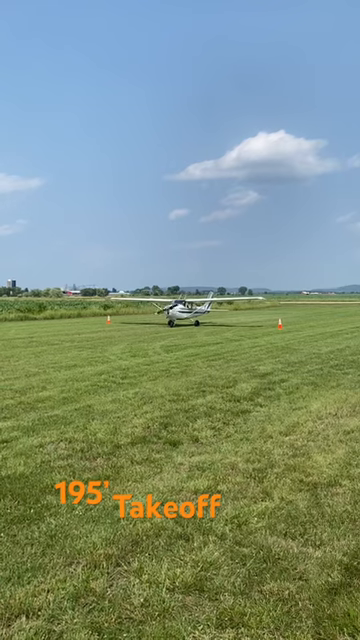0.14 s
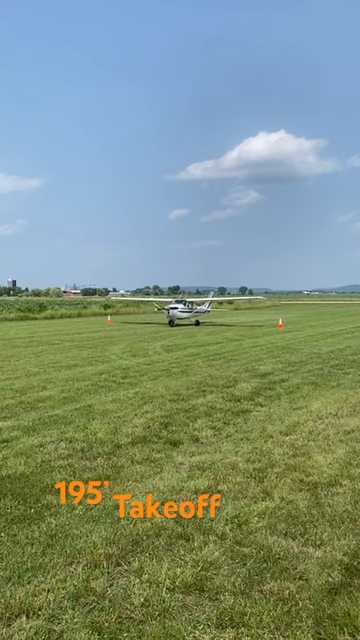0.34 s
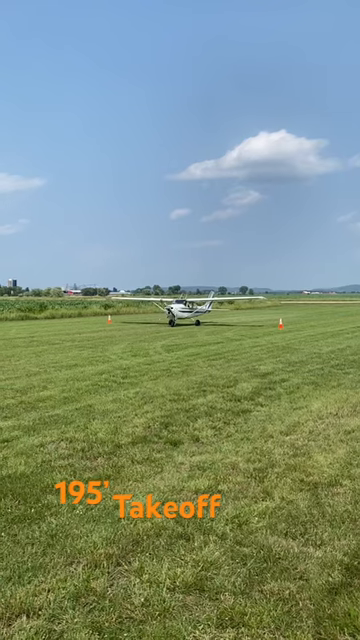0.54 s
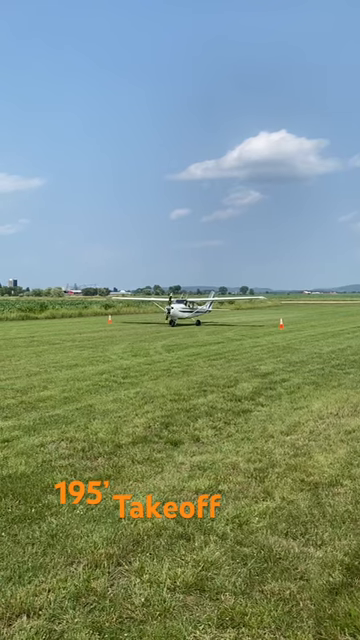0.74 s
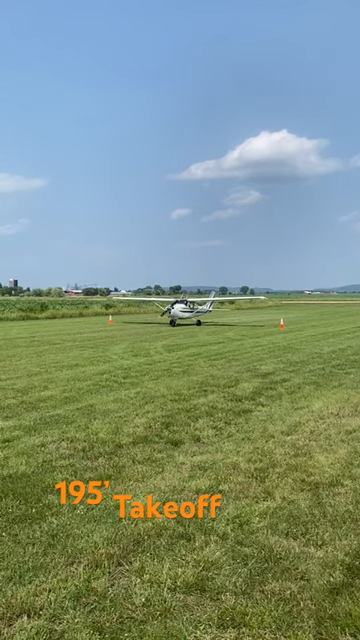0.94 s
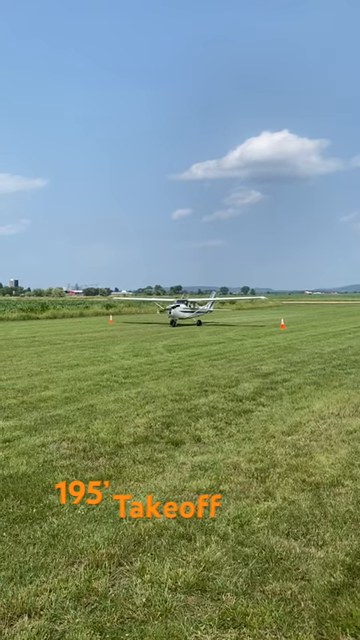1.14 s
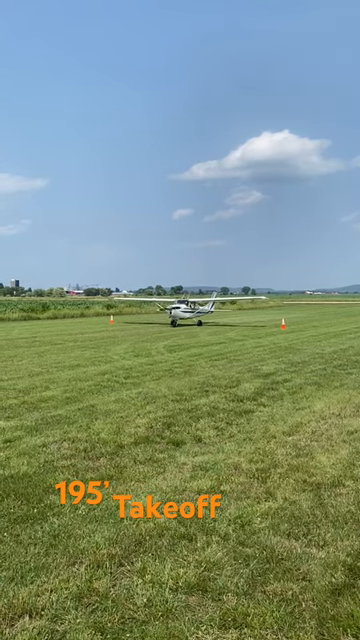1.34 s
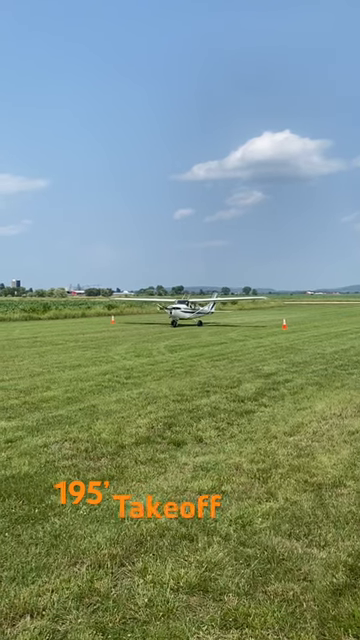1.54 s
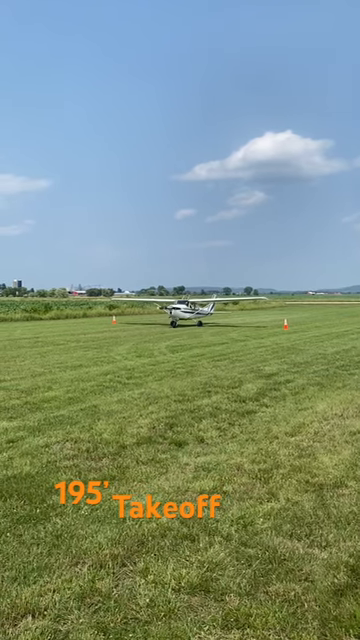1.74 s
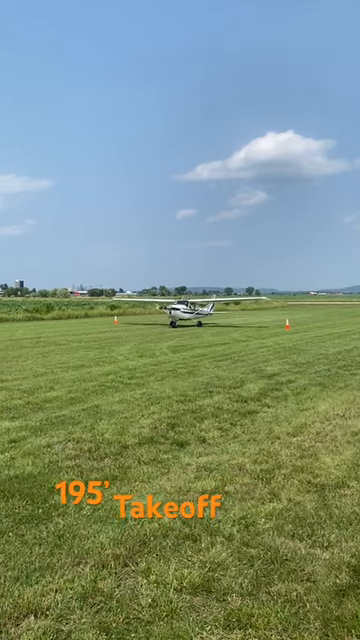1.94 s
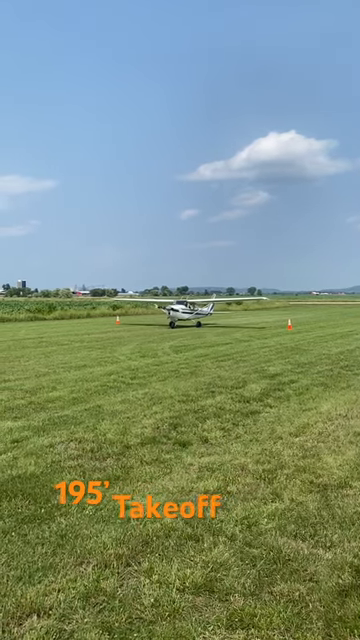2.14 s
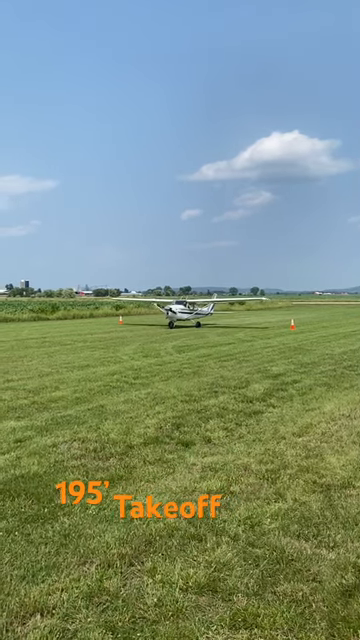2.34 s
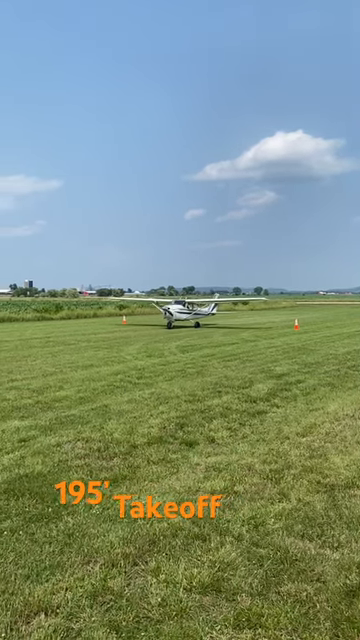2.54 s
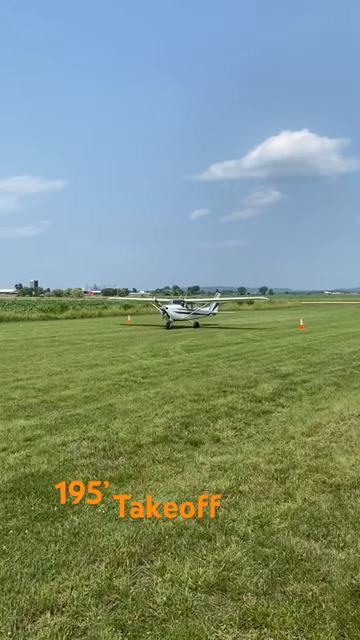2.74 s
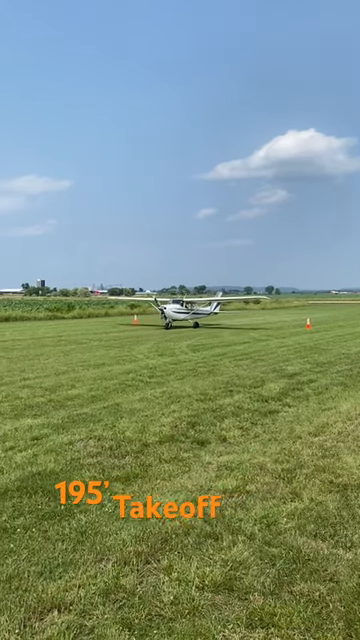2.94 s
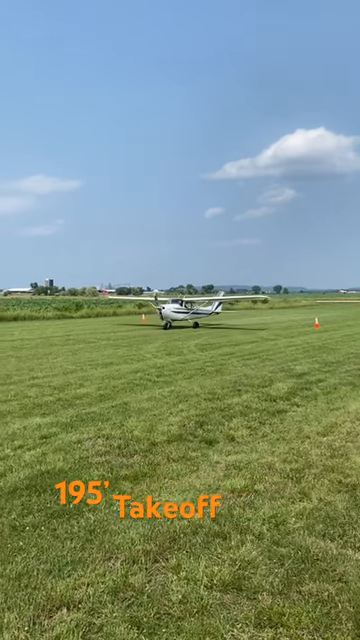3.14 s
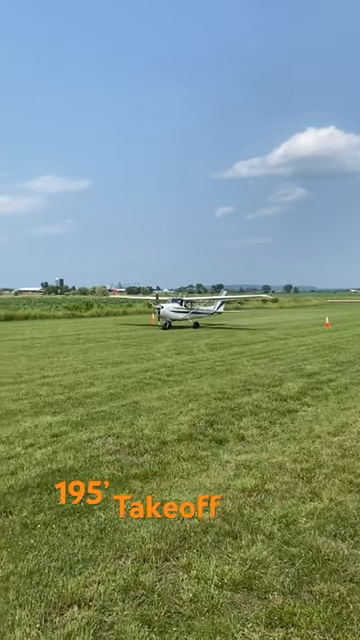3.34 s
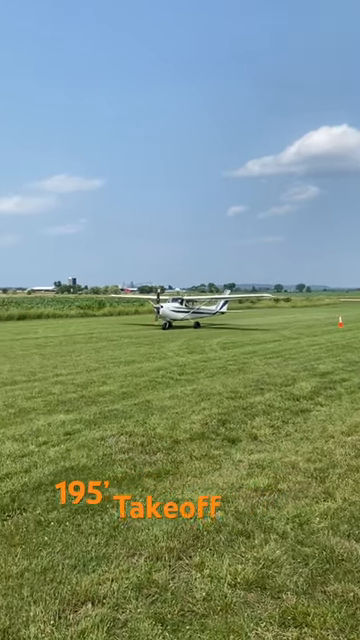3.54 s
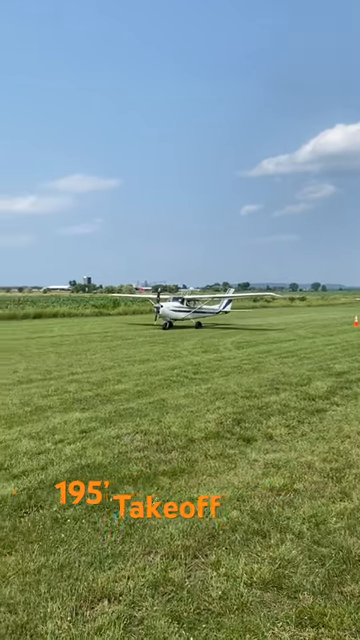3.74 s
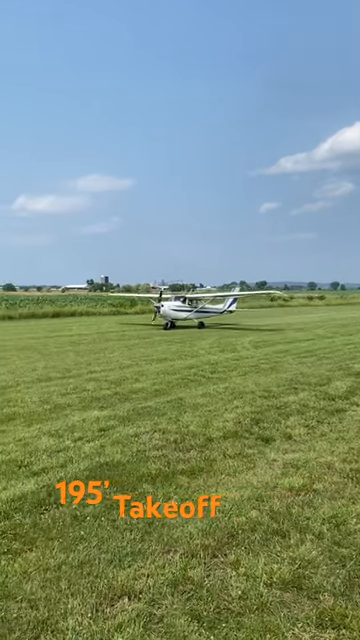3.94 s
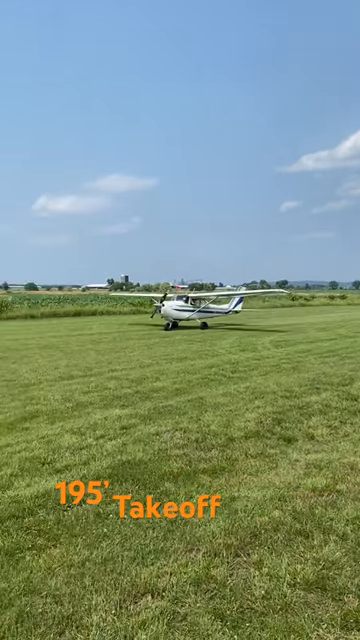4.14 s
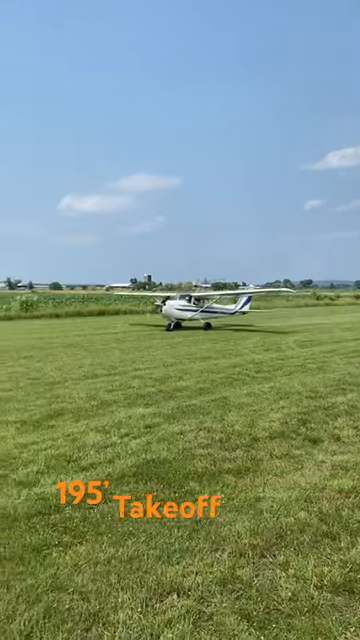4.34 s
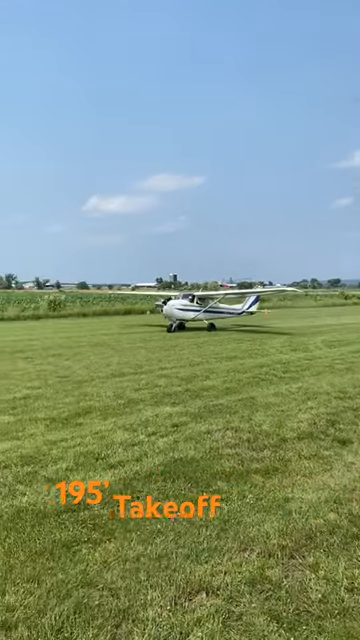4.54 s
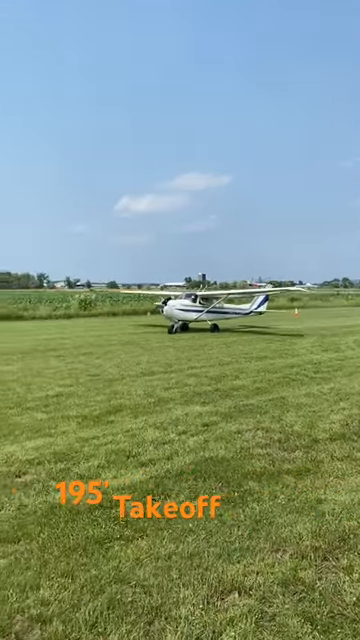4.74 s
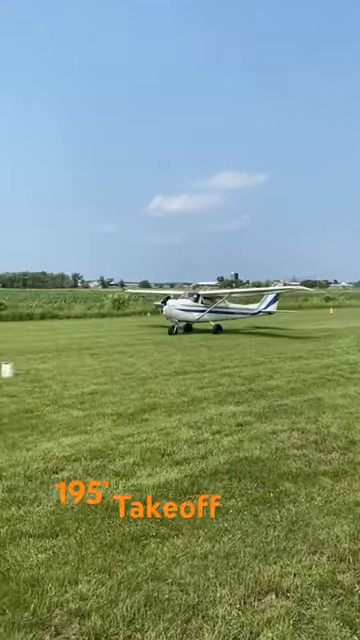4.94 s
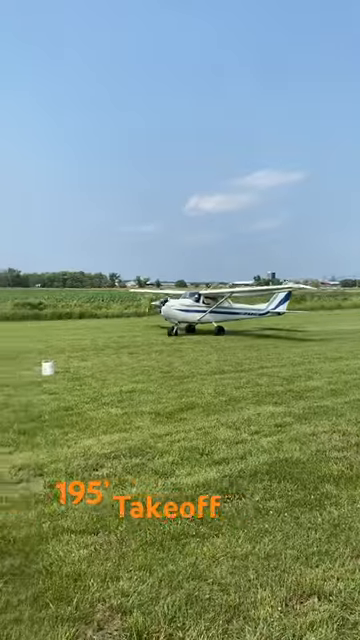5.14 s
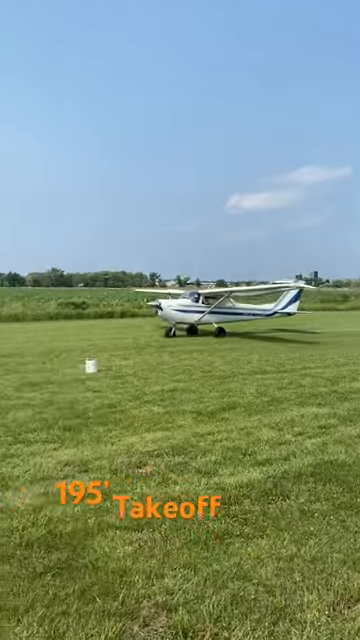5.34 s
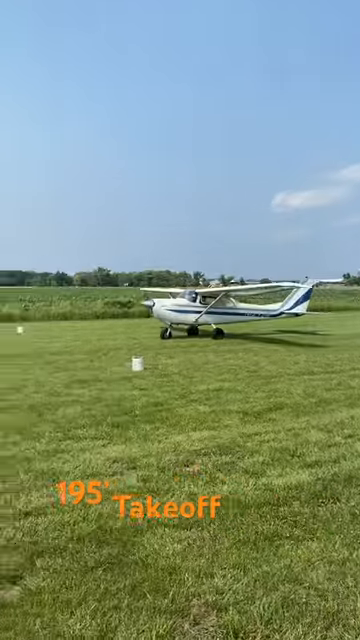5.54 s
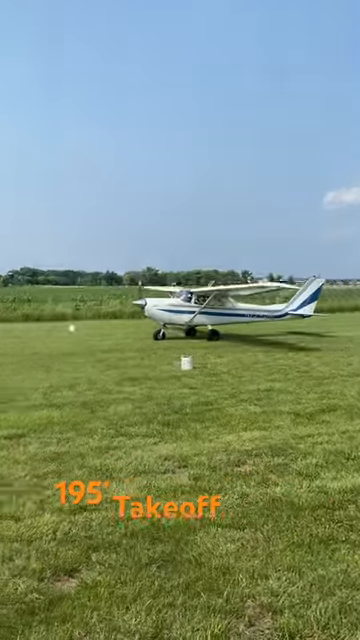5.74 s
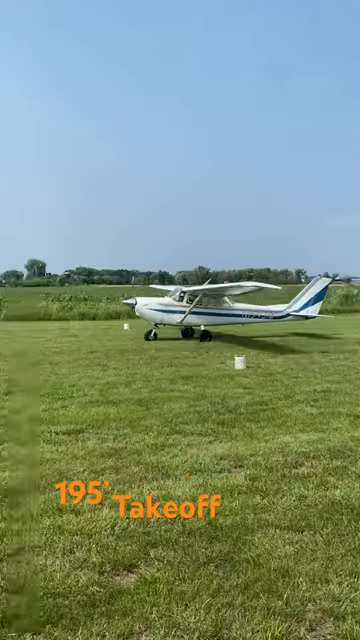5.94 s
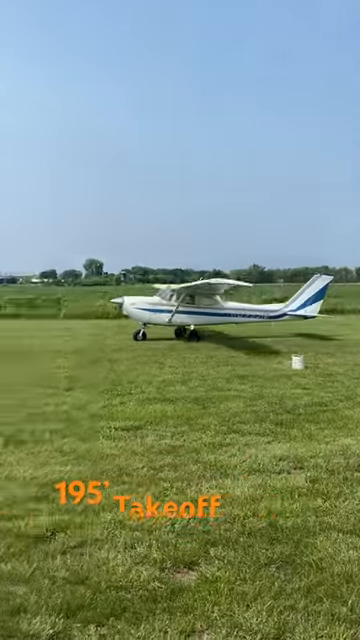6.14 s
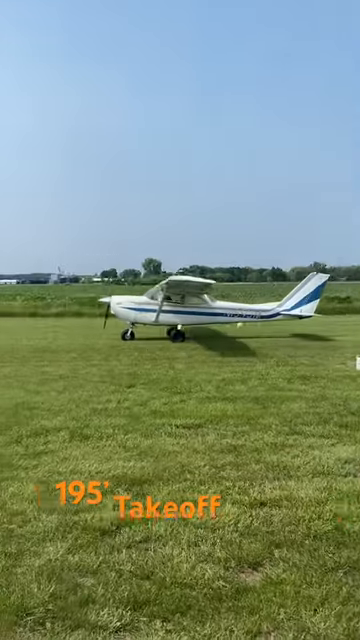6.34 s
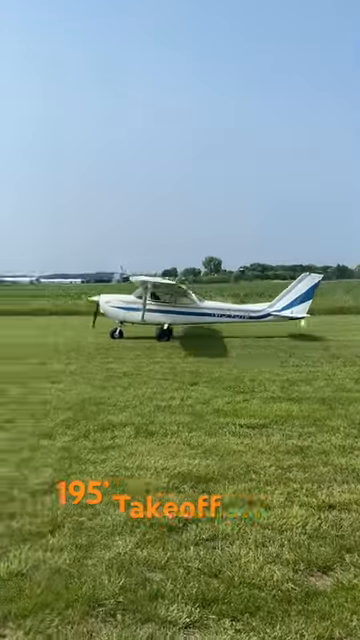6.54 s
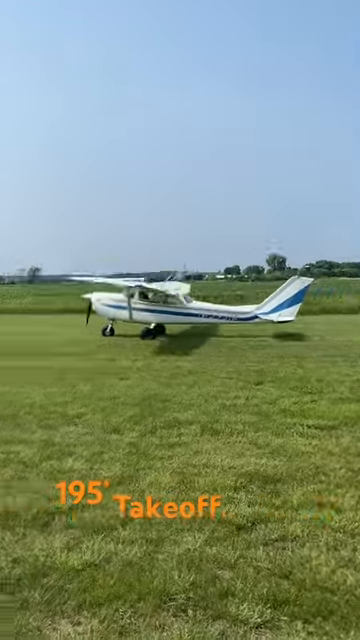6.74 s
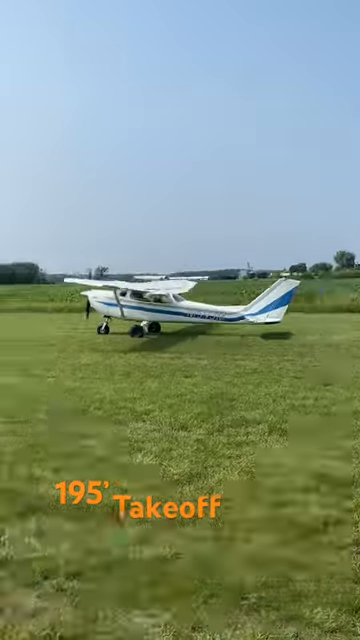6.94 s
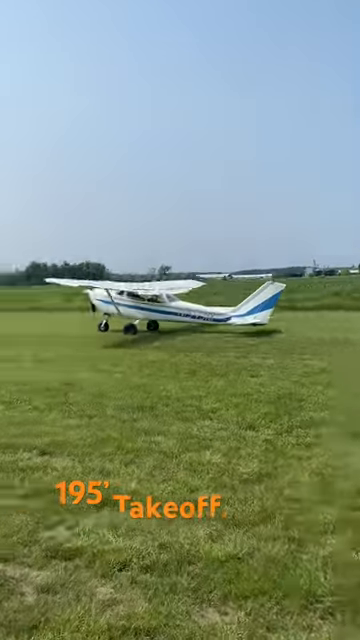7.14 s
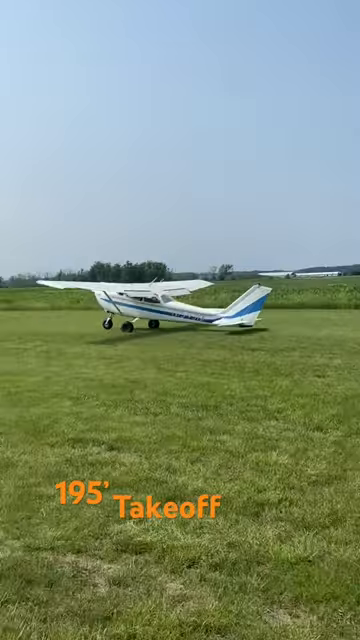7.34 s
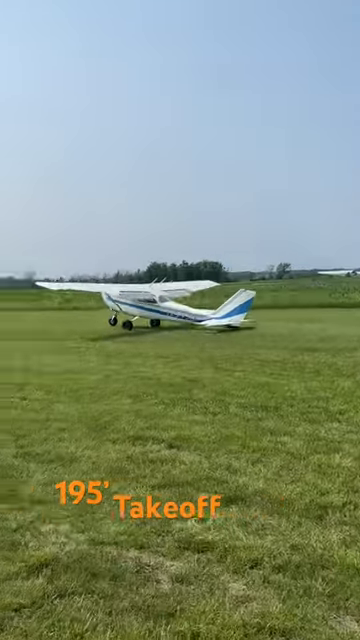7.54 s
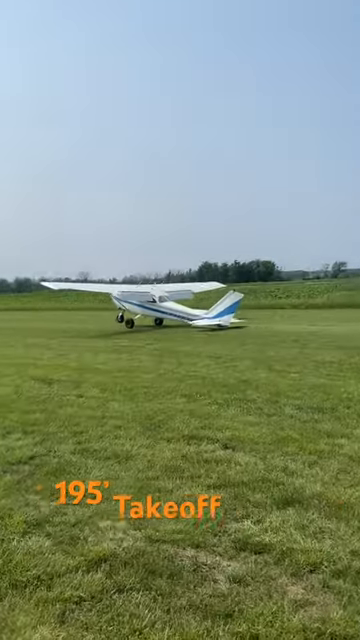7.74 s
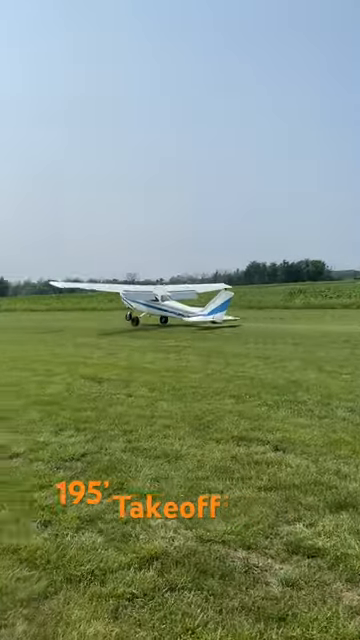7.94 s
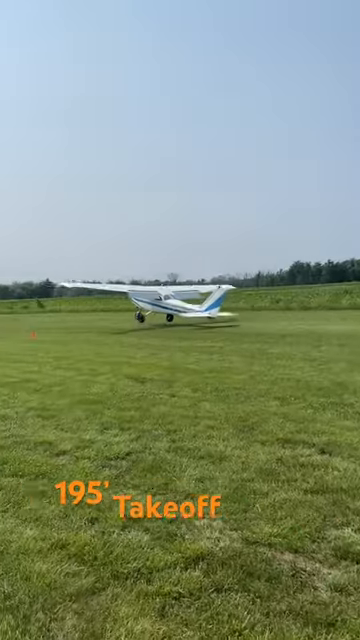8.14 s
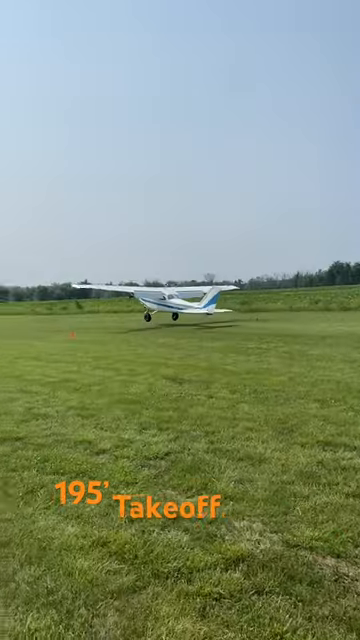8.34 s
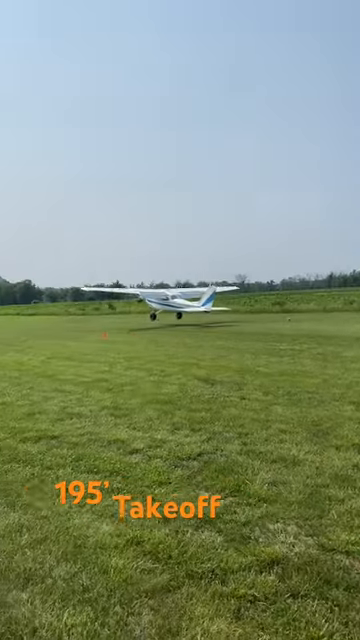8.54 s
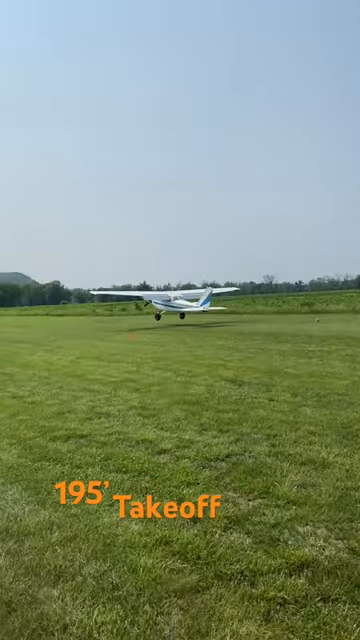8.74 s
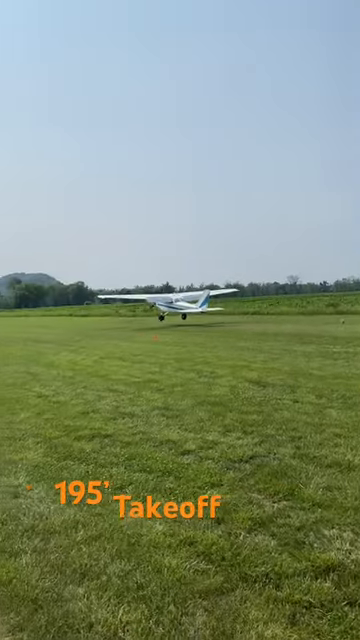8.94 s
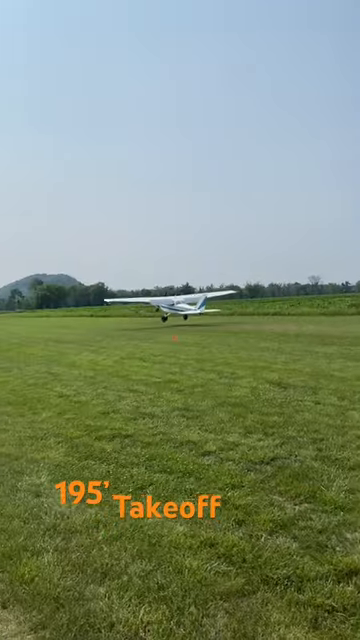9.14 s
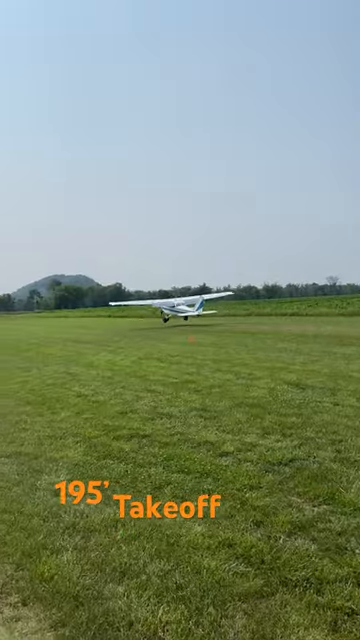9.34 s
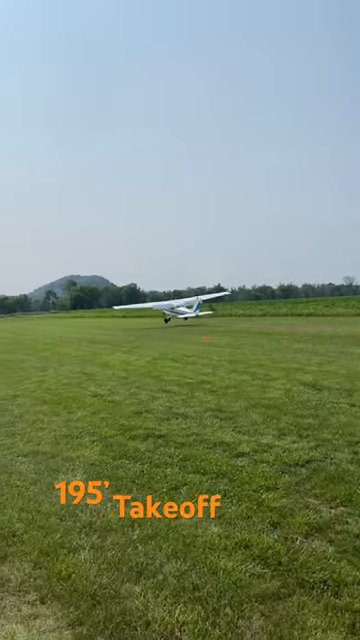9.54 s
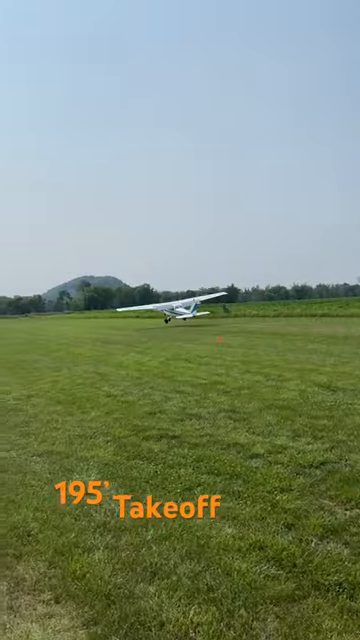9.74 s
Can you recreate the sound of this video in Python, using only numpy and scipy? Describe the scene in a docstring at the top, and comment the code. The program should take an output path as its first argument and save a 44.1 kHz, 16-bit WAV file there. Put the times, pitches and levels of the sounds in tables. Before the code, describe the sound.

A small propeller airplane drones at full power toward the listener, buzzes sharply past at close range, then fades to a dull hum over wind.

```python
"""On a grass strip, a light single-engine airplane takes off and passes close by after six seconds.
Behind it all is light wind, made of low noise with short gusts. Chopped noise makes the stirred air.
The propeller buzzes as its disc sweeps past: a stack of harmonics, one pulse a blade.
The exhaust crackles with one crack a firing, and a few low tones make the drone.
A dull hum is left as it climbs away. Two closely spaced microphone ports give left and right."""
import sys
import numpy as np
from scipy import signal
from scipy.fft import rfft, irfft
from scipy.io import wavfile
from scipy.ndimage import uniform_filter1d, minimum_filter1d, map_coordinates

SR = 44100
rng = np.random.default_rng(int(sys.argv[2]) if len(sys.argv) > 2 else 0)


def to_wav(s):
    """Save 16-bit WAV."""
    ch = np.atleast_2d(s).T  # columns
    pcm = np.round(np.clip(ch, -1, 1) * 32767)  # PCM
    wavfile.write(sys.argv[1], SR, pcm.astype(np.int16))


N = 432180  # samples, 9.8 s
TIME = np.arange(N) / SR  # seconds
BINS = np.fft.rfftfreq(N, 1 / SR)  # Hz
CUTOFF_HZ = 15800

# The pass: the airplane closes in, swings from nose to tail around ABEAM_S, then draws away.
CLOSING_FROM_S, CLOSING_TO_S = 2.24, 4.8
ABEAM_S, SWING_S, DISTANCE_DOUBLES_S = 6.014, 0.43, 2.05

# Engine firings, and blade passes, as heard with the Doppler shift.
# Each row: time in seconds, rate in Hz.
FIRING_RATE = [(0.0, 91), (0.15, 91.06), (0.45, 88.98), (0.699, 88.17), (1.2, 89.36), (1.8, 90.2),
               (2.6, 90.2), (3.1, 90.7), (3.699, 90.7), (4.3, 91.05), (4.95, 91.46), (5.45, 90.25),
               (6.05, 90.25), (6.5, 89.6), (6.9, 87.87), (7.8, 86.75), (8.6, 86.3), (9.8, 85.1)]
# Relative spectra of the layers. Each row: frequency in Hz, level in dB.
# The blade spectrum is tilted further by the blade sharpness.
BLADE_SPECTRUM = [(450, -1), (540, -1.5), (630, -8.5), (720, -12.5), (900, -12), (1020, -10), (1300, -17),
                  (2000, -20.5), (2800, -22), (3400, -33), (4300, -49)]
CRACK_SPECTRUM = [(300, -35), (680, -9.5), (850, -2.5), (1200, -0.5), (1700, 0.5), (2200, -1), (2900, -0.5),
                  (3400, -8), (5000, -9.5), (7500, -24), (10500, -26), (14000, -41)]
HISS_SPECTRUM = [(500, -24), (1500, 4), (2800, 6), (3600, -0.5), (4900, 1), (6200, 0), (7500, 0),
                 (8700, -0.5), (10500, -2.5), (12000, -9.5), (13800, -25.5), (15500, -26.5)]
SLIPSTREAM_SPECTRUM = [(100, -23.5), (300, -7.5), (450, -4.5), (700, -3), (1050, 2), (1500, -5), (2000, -7),
                       (2800, -14.5), (3400, -28.5), (8000, -31)]
RUMBLE_SPECTRUM = [(15, -26), (30, -13), (45, -7), (70, -1), (110, -0.5), (200, -2), (300, -6), (480, -8.5),
                   (650, -14.5), (1500, -47)]
# Tones from unequal cylinders and blades.
# Each row: multiple of the firing rate, level in dB within the turbulence layer, before it wavers.
UNEVEN_TONES = [(.5, -13.5), (1.5, -8), (1.749, -10), (2.499, -15.5), (3.5, -14.5), (4.5, -18.5),
                (5.5, -14.5), (6.5, -20)]
# Phase between left and right, opposite from 7.6 to 12 kHz.
# Each row: frequency in Hz, phase by which left leads in radians.
LEFT_RIGHT_PHASE = [(20, 0), (1800, 0.21), (2700, 1.0), (3600, 0.83), (4200, 1.5), (4850, 2.5),
                    (5600, 1.62), (6500, 2), (7600, np.pi), (12000, np.pi), (13500, 3.5), (15000, 5)]
# Left port against right. Each row: frequency in Hz, left minus right in dB.
PORT_BALANCE = [(200, 0.098), (380, -0.13), (1200, 1), (2400, 0.59), (4400, -1.1), (8000, -0.025)]
# Part of the stirred air that the ports do not share. Each row: frequency in Hz, level in dB.
UNSHARED_AIR = [(30, -11.5), (90, -7.5), (250, -8.5), (600, -8), (1300, -18.5), (2500, -17.5), (4500, -7),
                (6500, -14), (7700, -39), (11500, -41), (14000, -13)]
# Rasp of the exhaust over time. Each row: time in seconds, level in dB.
RASP_LEVEL = [(0.0, -26.5), (0.45, -28.5), (1.25, -29.5), (1.85, -29), (2.05, -27), (2.4, -29), (2.7, -29),
              (3.1, -28.5), (3.8, -29.5), (4.1, -31), (4.3, -39), (4.85, -31.5), (5.2, -38), (5.56, -29.5),
              (5.85, -29.5), (6.3, -33), (6.7, -42), (7.3, -43.5), (7.9, -48.5), (9.8, -59)]
# How each layer carries through the pass, with a lobe (or a notch, if negative).
# Each named row: level far ahead in dB, level close ahead in dB, level behind in dB,
# hold after abeam in seconds, fade in dB per doubling of distance,
# lobe height in dB, lobe time in seconds, lobe width in seconds.
LAYER_CARRY = { "first order": (-13.5, -10.7, -12, 2.5, 10, -7.5, 6, 0.22),
               "second order": (-21.8, -14.3, -12.7, 1.17, 17.5, -5.5, 5.76, 0.25),
               "third order": (-28.3, -23, -20.7, 1.1, 25, 5, 5.68, 0.25),
               "fourth order": (-34, -24.5, -18.7, 0.6, 31, 8, 5.56, 0.28),
               "blade buzz": (-38, -33, -31, 1.0, 28.5, 16, 6.0, 1),
               "blade hiss": (-27.5, -29, -42.5, 2, 10.5, 2.5, 6, 1),
               "slipstream": (-36, -29.5, -35.5, 1.23, 10.5, 0.5, 5, 3),
               "turbulence": (-32.5, -30.5, -35.5, 1.5, 6, -2.5, 6, 1)}
# Puffs of wind. Each row: time in seconds, length in seconds, rise of the low turbulence in dB.
WIND_GUSTS = [(1.084, 0.04, 8.5), (1.416, 0.05, 3), (1.57, 0.04, 6.5), (1.69, 0.043, 2.5),
              (2.14, 0.045, 10.5), (2.38, 0.038, 4), (2.74, 0.035, 5.5), (3.05, 0.041, 2.5),
              (3.293, 0.035, 6.5), (3.696, 0.04, 1.5), (5.565, 0.045, 6)]
# Surges of the propeller's sound on the approach.
# Each row: time in seconds, width in seconds, rise of the buzz in dB, rise of the hiss in dB.
PROPELLER_SURGES = [(0.1, 0.24, 5.5, 6), (1.32, 0.22, 0, 2.5), (2.15, 0.32, 2.5, -1),
                    (2.57, 0.18, 3.5, 3.5), (2.92, 0.23, 7, 0.5), (3.23, 0.06, 0, 4.5), (4.05, 0.11, -2, 5),
                    (4.5, 0.15, 3.5, -1.5)]
# The band that the reflection off the grass hollows out (a negative depth lifts it).
# Each row: time in seconds, centre in Hz, depth in dB.
GRASS_DIP = [(0, 630, 4), (1.0, 620, 5), (1.75, 670.3, 7), (2.6, 659.7, 1.5), (3.6, 720, 1.5),
             (4.4, 853, 0.5), (6.4, 790, -1.5), (7.001, 660, 2.5), (7.549, 517, 10.5), (8.4, 458, 6.5),
             (9.8, 406, 12)]
# Moments when the rasp swells in one part of its range.
# Each row: time in seconds, length in seconds, centre in Hz, width in octaves, rise in dB.
RASP_FLARES = [(0.15, 0.08, 1200, 0.7, 2), (0.42, 0.06, 1800, 0.8, 2.5), (2.15, 0.07, 1900, 0.9, 6.5),
               (3.13, 0.15, 1300, 1.1, 2.5), (3.62, 0.1, 1600, 0.9, 2.5), (4.09, 0.08, 1900, 0.9, 2),
               (5.55, 0.06, 9990, 1.5, 17), (5.628, 0.025, 9900, 1.5, 13), (5.82, 0.06, 2700, 1.0, 3)]


def amp(db):
    """Turns decibels into a gain."""
    return 10 ** (np.asarray(db) / 20)


def unit(x):
    """Scales a sound to an rms of 1."""
    return x / np.sqrt(np.mean(x ** 2) + 1e-20)


def curves(rows):
    """Reads each column of a timed table at every sample."""
    s, *columns = np.transpose(rows)
    return [np.interp(TIME, s, column) for column in columns]


def read(points, hz):
    """Reads a spectrum between its points, on a log-frequency axis."""
    point_hz, value = np.transpose(points)
    return np.interp(np.log(hz + 1), np.log(point_hz), value)


def colour(x, spectrum):
    """Filters a sound by a spectrum, then scales it to an rms of 1."""
    return unit(irfft(rfft(x) * amp(read(spectrum, BINS)), N))


def reshape(x, gain_db):
    """Filters by gain_db(hz, s), a gain that varies over frequency and time."""
    hz, s, z = signal.stft(x, SR, nperseg=1024, noverlap=768)
    z = z * amp(gain_db(hz[:, None], s))
    return signal.istft(z, SR, nperseg=1024, noverlap=768)[1][:N]


def drift(per_s):
    """Slow chance of rms 1, wandering up to about per_s times a second."""
    size = 2048
    hz = np.arange(size // 2 + 1) * SR / N
    slow = irfft(rfft(rng.standard_normal(size)) / (1 + (hz / per_s) ** 4))
    return np.interp(TIME, np.linspace(0, N / SR, size), unit(slow))


def swell(at_s, width_s):
    """A bell-shaped rise and fall of height 1."""
    return np.exp(-((TIME - at_s) / width_s) ** 2)


def tailward():
    """Goes from 0 while the nose faces the listener to 1 once the tail does."""
    return (1 + np.tanh((TIME - ABEAM_S) / SWING_S)) / 2


def passing(layer):
    """A layer's level in dB: changes on the way in, meets its lobe, holds, then fades with distance."""
    far_db, close_db, behind_db, hold_s, fade_db, lobe_db, lobe_at_s, lobe_width_s = LAYER_CARRY[layer]
    coming = np.interp(TIME, [CLOSING_FROM_S, CLOSING_TO_S], [far_db, close_db])
    leaving_s = np.maximum(TIME - ABEAM_S - hold_s, 0)
    going = behind_db - fade_db * np.log2(1 + leaving_s / DISTANCE_DOUBLES_S)
    lobe = lobe_db * swell(lobe_at_s, lobe_width_s)
    return coming + tailward() * (going - coming) + lobe


def rumble(firings, noise_db=2, waver_db=2.5, buffet_db=2.0, calm_db=-1.0, wind_from_s=0.96):
    """Lumpy wind that picks up after a calm start, with the weak in-between orders of the engine."""
    tones = np.zeros(N)
    for k, db in UNEVEN_TONES:
        phase = 2 * np.pi * (k * firings + rng.random())
        tones += amp(db + waver_db * drift(4.8)) * np.cos(phase)
    calm = calm_db * np.clip((wind_from_s - TIME) * 10, 0, 1)
    gusts = sum(db * swell(s, length_s) for s, length_s, db in WIND_GUSTS)
    wind_db = buffet_db * drift(15) + calm + gusts
    wind = amp(noise_db + wind_db) * colour(rng.standard_normal(N), RUMBLE_SPECTRUM)
    return np.sqrt(2) * tones + wind


def throb(firings, depth, width):
    """A swell once a firing, at the moment it happens."""
    bump = np.exp((np.cos(2 * np.pi * firings) - 1) / width ** 2)
    return unit(1 + depth * bump)


def rush(firings, spectrum, depth, width, flicker_db):
    """Turbulent air: noise chopped once a firing, with a level that flickers."""
    noise = rng.standard_normal(N) * throb(firings, depth, width) * amp(flicker_db * drift(25))
    return colour(noise, spectrum)


def air(firings):
    """All the stirred air: hiss at the blades, slipstream and low buffeting."""
    # just past abeam, the rush comes in distinct puffs
    puffing = np.interp(TIME, [5.4, 6.4, 7.5, 9], [0, 1, 0.9, 0.3])
    surges_db = sum(db * swell(s, width_s) for s, width_s, _, db in PROPELLER_SURGES)
    hiss = rush(firings, HISS_SPECTRUM, depth=0.77 + 0.97 * puffing, width=0.31, flicker_db=1.6)
    hiss = amp(passing("blade hiss") + surges_db) * hiss
    slipstream = rush(firings, SLIPSTREAM_SPECTRUM, depth=0.3 + 3.8 * puffing, width=0.38, flicker_db=1.0)
    slipstream = amp(passing("slipstream")) * slipstream
    return hiss + slipstream + amp(passing("turbulence")) * rumble(firings)


def harmonic(firings, k, swing=-2.5, sweep=8.15, lag=0.69, offset=1.51):
    """Order k of a pulse whose crack comes before its thump; its shape turns over in the pass."""
    # swing, sweep, lag and offset set the phase in radians
    phase = sweep / k - lag * min(k, 7) + offset + swing * tailward()
    return np.sqrt(2) * np.cos(2 * np.pi * k * firings + phase)


def blade_sharpness(ahead_db=-4.5, behind_db=-3.0, abeam_db=2.0, width_s=0.42, early_s=0.08):
    """Tilt of the blade pulse in dB per octave: brightest as the disc is seen edge on."""
    edge_on = abeam_db * swell(ABEAM_S - early_s, width_s)
    return ahead_db + tailward() * (behind_db - ahead_db) + edge_on


def propeller(firings, level_db, sharpness, far_flutter_db=3.0, jitter=0.002, slap_db=1.6):
    """One pressure pulse a blade, built from harmonics; sharpest in the plane of the disc."""
    mean_hz = np.mean(np.array(FIRING_RATE), axis=0)[1]
    firings = firings + jitter * drift(25)
    # air on a long path makes each harmonic flutter
    flutter = far_flutter_db * (1 - amp(level_db - level_db.max()))
    # blades cutting gusty air slap now harder, now softer, most of all in the treble
    slap = slap_db * drift(51)
    out, power = np.zeros(N), np.zeros(N)
    for k in range(5, 48):
        gain = amp(read(BLADE_SPECTRUM, k * mean_hz) + sharpness * np.log2(k))
        out += gain * amp(flutter * drift(2.8) + slap * k / 20) * harmonic(firings, k)
        power += gain ** 2
    return amp(level_db) * out / np.sqrt(power)


def twinkle(x, depth_db, patch_hz, patch_s):
    """Moving air on a long path lifts and sinks patches of the sound by chance."""
    field = rng.standard_normal((200, 400))

    def patches_db(hz, s):
        place = np.broadcast_arrays(hz / patch_hz, s / patch_s)
        return depth_db * map_coordinates(field, place, order=2, mode="mirror")

    return reshape(x, patches_db)


def chirp(x, s_per_octave=0.0004, centre_hz=2000):
    """The treble of each crack arrives first, so it rings as a short falling chirp."""
    delay_s = -s_per_octave * np.log2((BINS + 1) / centre_hz)
    return irfft(rfft(x) * np.exp(-2j * np.pi * np.cumsum(delay_s) * SR / N), N)


def flare(x):
    """Lifts one band for a moment at each flare."""
    def lift_db(hz, s):
        total = 0
        for at, length, centre, octaves, db in RASP_FLARES:
            moment = np.exp(-((s - at) / length) ** 2)
            band = np.exp(-(np.log2((hz + 1) / centre) / octaves) ** 2)
            total = total + db * moment * band
        return total

    return reshape(x, lift_db)


def crackle(firings, spread_db=1.2, surge_db=1.4, echo_s=0.001625, wander=0.13, echo=0.32,
            rough=0.18, puff_s=0.00071, lead_s=0.0008):
    """Each firing sends a crack and a puff from the pipe; weak echoes off the airframe come and go."""
    count = int(firings[-1])
    size, slip = rng.standard_normal((1000, 2))[:count].T
    at = np.interp(np.arange(1, count + 1), firings, TIME) - lead_s + .000008 * slip
    cylinder_db = np.resize([0.82, -0.34, -0.11, -0.33], count)  # four unequal cylinders
    gain = amp(cylinder_db + spread_db * size + surge_db * np.interp(at, TIME, drift(9.7)))
    cracks, paths = np.zeros(N), 4
    for path in range(paths):  # path 0 is the direct crack, the others are echoes
        delay = echo_s * path / paths * (1 + wander * np.interp(at, TIME, drift(1.84)))
        strength = echo * np.interp(at, TIME, np.tanh(drift(5))) if path else 1
        place = np.round((at + delay) * SR).astype(int) % N
        np.add.at(cracks, place, strength * gain)
    # each puff is noise that dies away after its crack
    puffs = signal.lfilter([1], [1, -np.exp(-1 / (puff_s * SR))], cracks) * rng.standard_normal(N)
    bursts = unit(cracks) + rough * unit(puffs)
    bursts = twinkle(bursts, depth_db=1.2, patch_hz=296.0, patch_s=0.06)
    return flare(chirp(colour(bursts, CRACK_SPECTRUM)))


def drone(firings, null_s=1.31, null_width_s=0.38, flutter_db=1.07, steady_s=1.3, pipe_db=-56, shake_db=0.19):
    """The clean low orders of exhaust and propeller; the lowest cancels and flips sign early on."""
    from_null = TIME - null_s
    null = np.sign(from_null) * np.sqrt(abs(from_null) / (abs(from_null) + null_width_s))
    first_gain = amp(passing("first order") + shake_db * drift(9.3))
    out = first_gain * null * harmonic(firings, 1, swing=3.22)
    # the third and fourth orders flutter while the path through the air is long
    flutter = flutter_db * (1 - swell(ABEAM_S, steady_s))
    for k, layer in enumerate(["second order", "third order", "fourth order"], 2):
        out += amp(passing(layer) + (k - 2.0) * flutter * drift(5)) * harmonic(firings, k)
    # a faint pipe tone carries astern
    pipe = amp(pipe_db + flutter * drift(5)) * tailward() * harmonic(firings, 6)
    return out + pipe


def over_grass(x, width_octaves=0.31):
    """At a grazing angle the ground reflection cancels part of one band; close by it does not."""
    at, dip_hz, dip_db = np.transpose(GRASS_DIP)

    def dip(hz, s):
        octaves_away = np.log2((hz + 1) / np.interp(s, at, dip_hz))
        return -np.interp(s, at, dip_db) * np.exp(-(octaves_away / width_octaves) ** 2)

    return reshape(x, dip)


def ports(direct, scattered):
    """Left and right drift apart in phase as pitch rises, and are opposite from 7.6 to 12 kHz."""
    side = np.array([[1], [-1]])  # left, right
    fade = signal.windows.tukey(N, .001)
    phase = np.exp(side * 1j * read(LEFT_RIGHT_PHASE, BINS) / 2)
    pair = phase * amp(side * read(PORT_BALANCE, BINS) / 2)
    # scattered sound is added on the left and taken away on the right
    unshared = side * rfft(fade * scattered) * amp(read(UNSHARED_AIR, BINS))
    return irfft(pair * (rfft(fade * direct) + unshared), N)


def scene():
    """Adds up the layers, which all follow the one crankshaft through a running count of firings."""
    firings = .94 + np.cumsum(curves(FIRING_RATE)[0]) / SR + .003 * drift(7.1)
    surges_db = sum(db * swell(s, width_s) for s, width_s, db, _ in PROPELLER_SURGES)
    blades = propeller(firings, passing("blade buzz") + surges_db, blade_sharpness())
    exhaust = amp(curves(RASP_LEVEL)[0]) * crackle(firings)
    direct = drone(firings) + exhaust + over_grass(blades + air(firings))
    scattered = over_grass(air(firings))  # fresh noise, apart from the direct air
    return ports(direct, scattered)


def record(dry, ceiling=1.0):
    """A peak limiter eases the loudest pulses down; then the recorder's band limit cuts the top."""
    wanted = np.minimum(1, min(ceiling, .98) / (abs(dry).max(0) + 1e-9))
    gain = uniform_filter1d(minimum_filter1d(wanted, size=601), size=601)
    lowpass = signal.firwin(511, CUTOFF_HZ, window=("kaiser", 9), fs=SR)
    return signal.oaconvolve(dry * gain, lowpass[None], "same")


dry = scene()
out = record(dry)
to_wav(out)
```